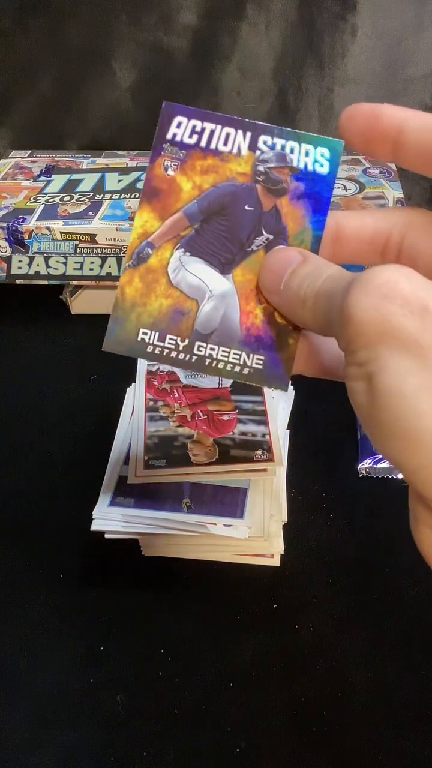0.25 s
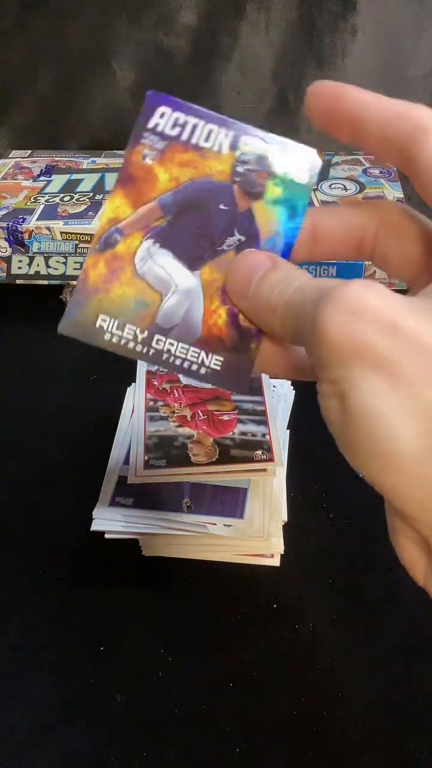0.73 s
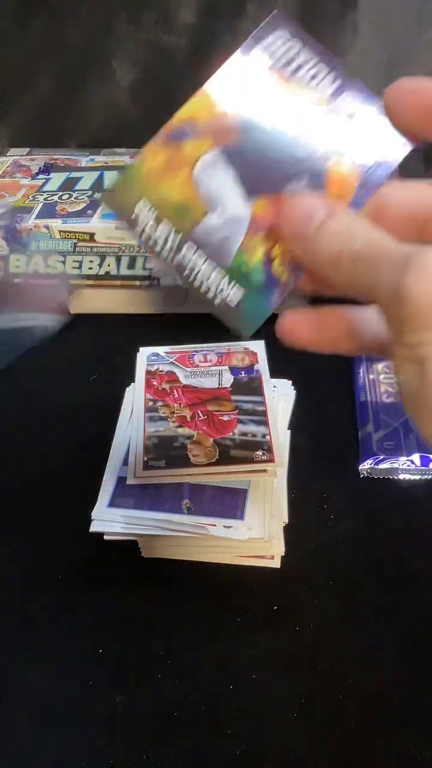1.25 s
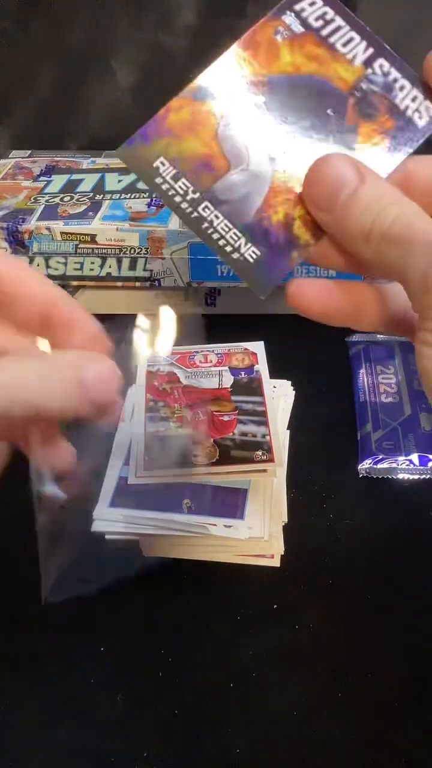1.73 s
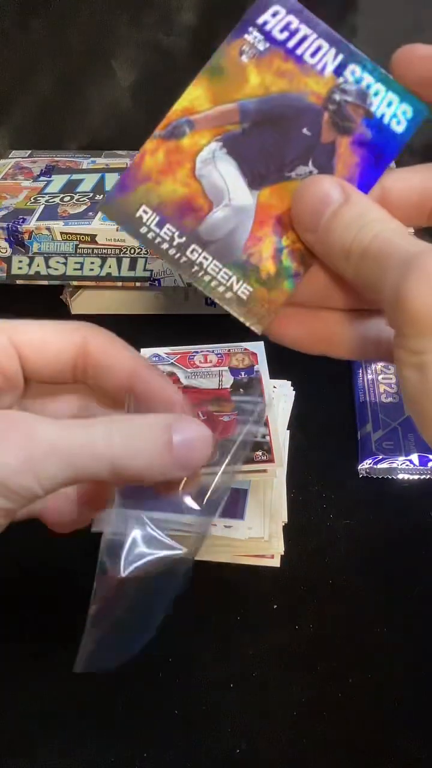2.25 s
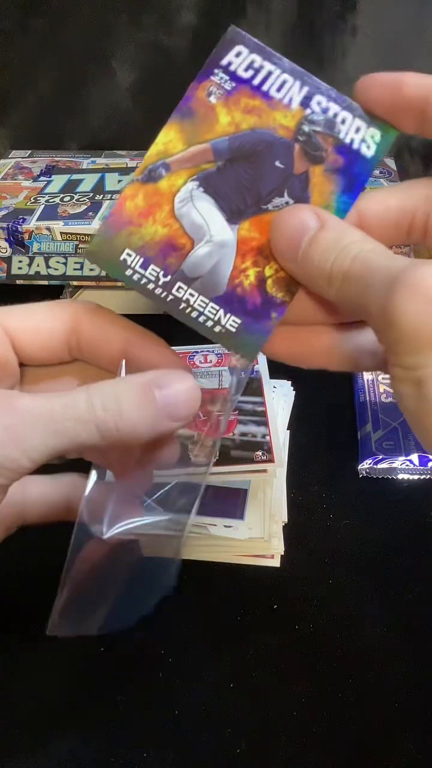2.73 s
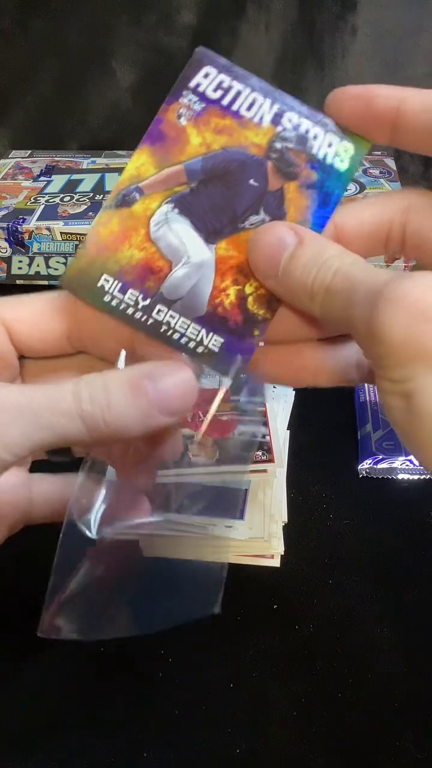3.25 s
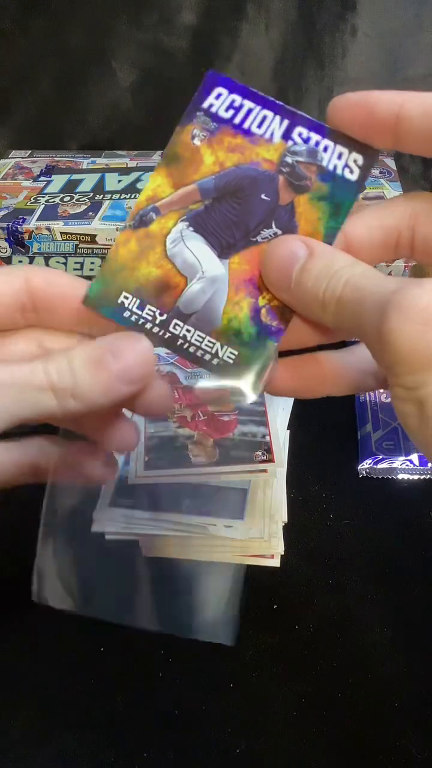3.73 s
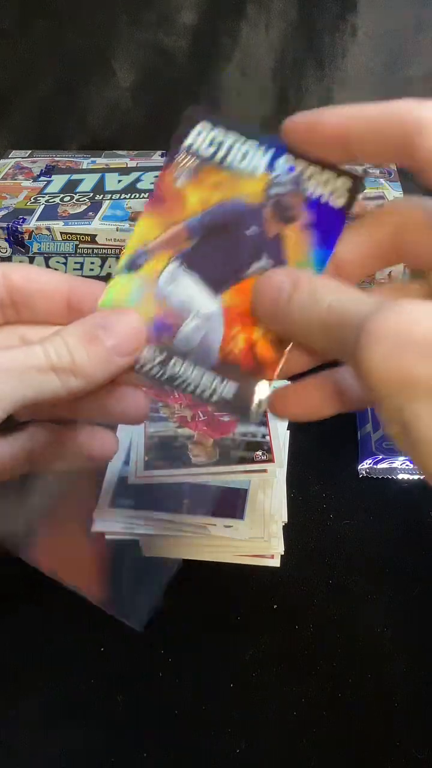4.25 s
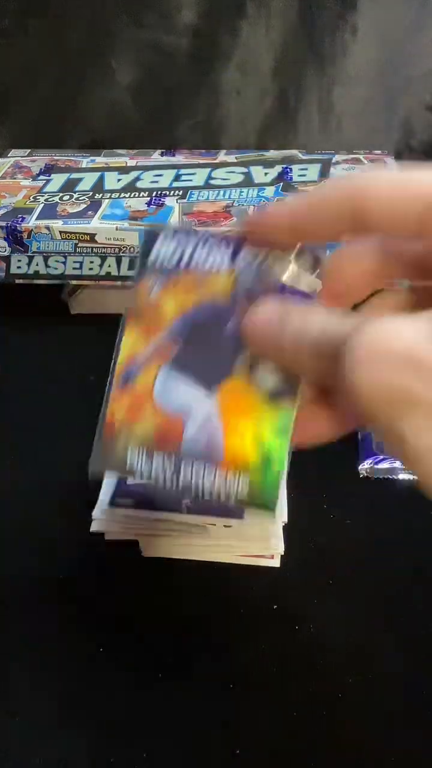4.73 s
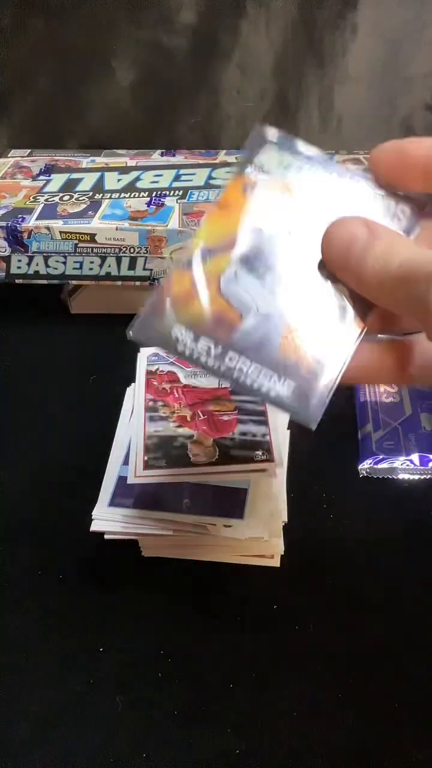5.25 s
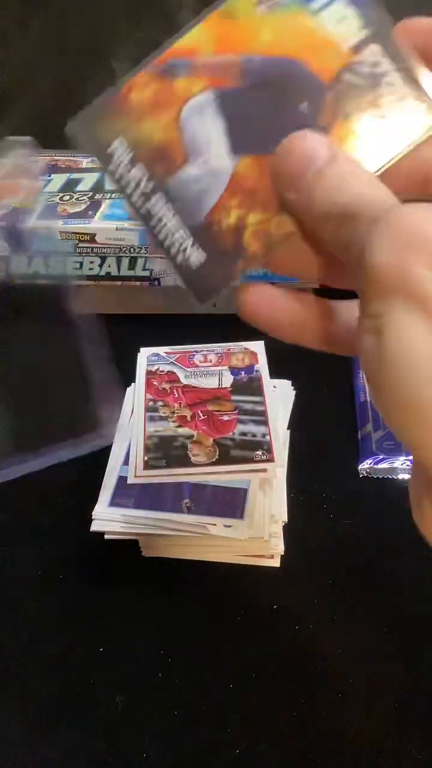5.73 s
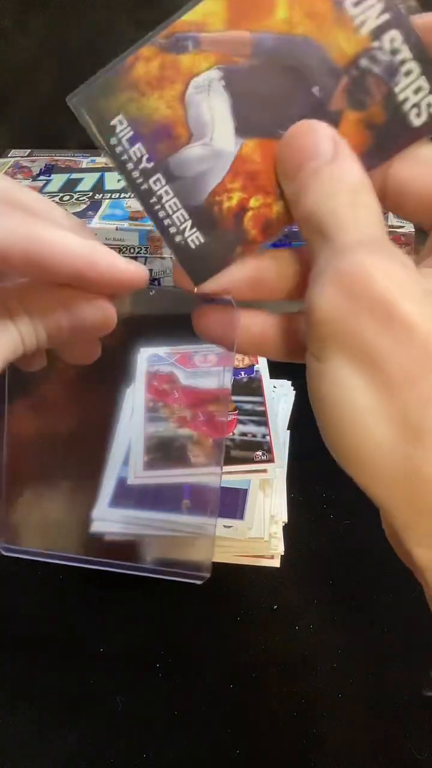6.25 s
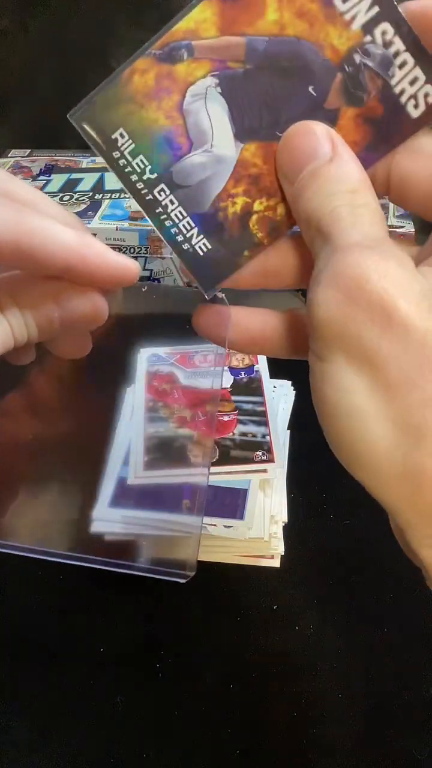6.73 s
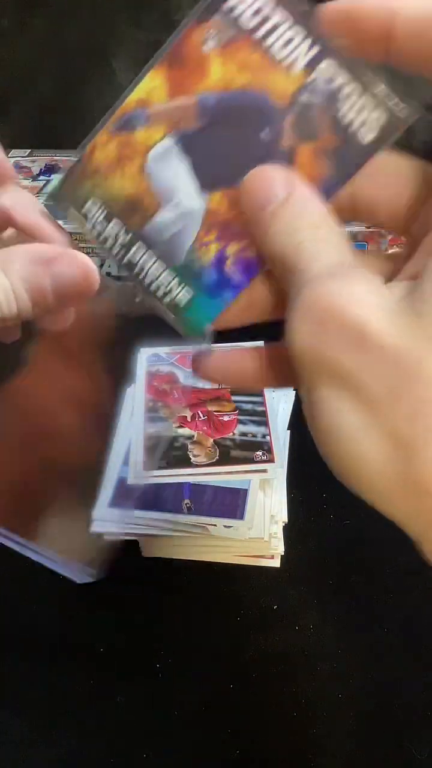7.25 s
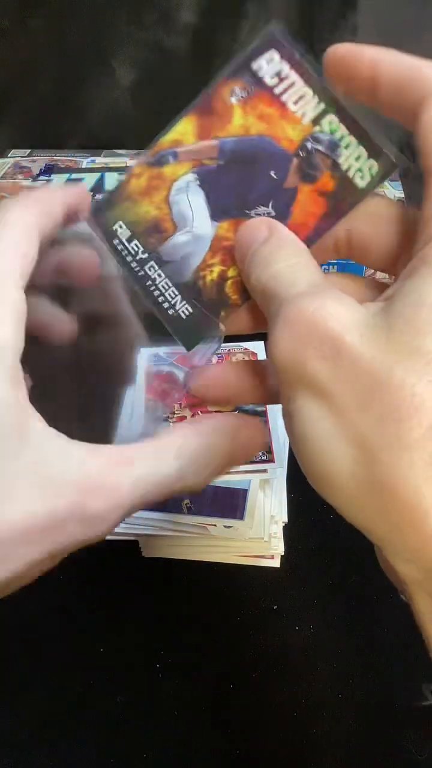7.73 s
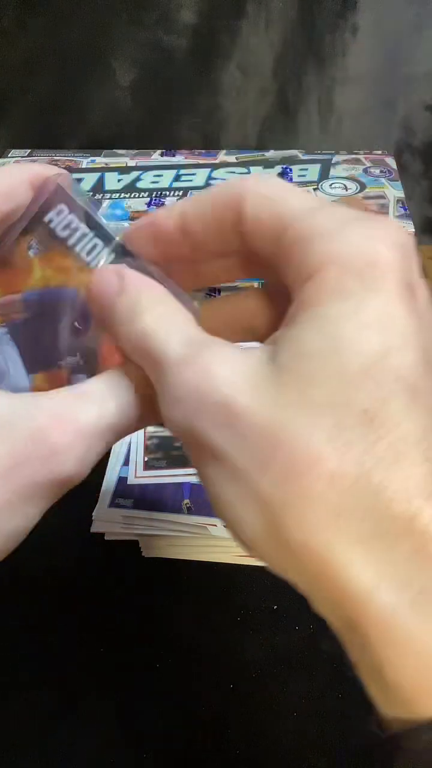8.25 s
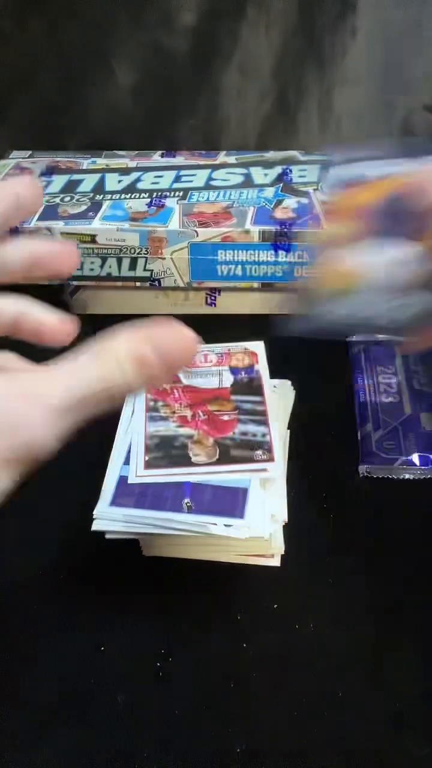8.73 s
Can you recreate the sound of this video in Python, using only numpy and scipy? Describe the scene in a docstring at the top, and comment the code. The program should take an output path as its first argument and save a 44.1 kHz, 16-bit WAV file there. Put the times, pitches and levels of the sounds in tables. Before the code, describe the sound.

A glossy card and soft plastic are handled close to the microphone in a small humming room. A dense burst of sharp snaps comes early, then scattered pops and clicks, quick raspy scrapes as the card enters a sleeve, a sparse pause, and lighter rubs and ticks against a stiff holder.

```python
"""Above a desk in a small humming room, a glossy card and soft plastic are handled close to the ear.
Buckling sheet snaps: a chirped spike and a short flutter drive a ringing filter, and weaker ticks follow.
Sliding faces hiss (shaped noise) and rasp (thousands of tiny slips); firmly gripped edges tick as they catch.
From 7 s the strokes take on the resonance of a stiff holder. Fingers rustle faintly around each stroke.
Quick reflections, a faint tail, a low rumble and wavering bands of hum place it in the room."""
import sys
import numpy as np
from scipy import signal
from scipy.fft import rfft, irfft
from scipy.io import wavfile
from scipy.ndimage import uniform_filter1d

SR = 44100
rng = np.random.default_rng(int(sys.argv[2]) if len(sys.argv) > 2 else 0)


def output_pcm(signal):
    """Save a mono or channel-first signal as 16-bit PCM at the path in sys.argv[1].

    Samples are clipped to [-1, 1] before scaling.
    """
    pcm = np.clip(np.atleast_2d(signal).T, -1, 1) * 32767
    wavfile.write(sys.argv[1], SR, np.round(pcm).astype(np.int16))


N = 396459  # length in samples, about 9 s

# sharp snaps, where an edge catches and a patch of sheet springs free, level before the sheet's colour:
# [t/s, level/dB, tilt/dB per octave, ring f/Hz]
SNAP_EVENTS = [(0.4538, -17, 7, 1510), (0.525, -27.5, 0, 6140), (0.592, -21, -1.5, 4340),
               (0.602, -13.5, -3, 6500), (0.641, -15.5, 2, 1650), (0.6635, -14.5, -2, 7800),
               (0.6947, -9, 6, 1340), (0.7059, -14, 2.5, 1600), (1.1658, -13, 5.5, 1280),
               (1.1977, -18.5, 0, 6300), (1.3856, -9.5, 0, 5850), (1.436, -7, 2, 1300),
               (1.6381, -23, .5, 4860), (2.011, -16, 4.5, 2550), (2.0463, -35, -4.5, 2680),
               (2.1138, -7, 0.5, 7250), (2.1705, -15, 2.5, 735), (2.1932, -19, 2.5, 7500),
               (2.7479, -30, 2.5, 1130), (3.213, -27, -3, 3620), (3.2444, -31.5, -3, 3380),
               (3.3271, -16, 3.5, 4160), (3.3406, -11, -3, 6300), (3.3465, -18, -4, 4310),
               (3.4731, -10, 0.7, 758), (3.5016, -18, 5.5, 1904), (3.6818, -25, -4.5, 8920),
               (3.9626, -18.5, 2, 1180), (4.0748, -18.5, 0, 1600), (4.24, -11, 0.7, 8900),
               (4.6783, -22, 0.3, 1650), (4.8637, -19.5, 4, 5650), (4.9442, -27, 1.5, 910),
               (5.756, -18, -1.5, 4840), (5.8915, -29, -2, 4730), (6.466, -30.5, 1, 1180),
               (6.8902, -17.5, 1, 4260), (7.0534, -25, 2.5, 3630), (7.0622, -28, 4, 3790),
               (7.0876, -31, -2.5, 8000), (7.4782, -26.5, -1, 2235), (7.5213, -31, -4.5, 5170),
               (7.6158, -16.5, 2.5, 1190), (7.9231, -23, 1.5, 7200), (8.3141, -19, 0.5, 4590),
               (8.3902, -27.5, 0, 6100), (8.4121, -24.5, -1, 1730), (8.6434, -23, -1, 2654),
               (8.6925, -27.5, -3, 2680), (8.7465, -12.5, 0.2, 2350), (8.768, -19, -1, 4660),
               (8.9031, -40.5, -7, 1750)]
# strokes of one face over another, level at full speed: [start t/s, length t/s, level/dB, grip 0-1]
STROKE_EVENTS = [(0.37, 0.13, -62, 0), (.62, 0.12, -50.5, 0.33), (1.12, 0.38, -65, 0.4),
                 (1.367, 0.085, -56.5, 0.3), (1.794, 0.2, -64.5, 0.2), (2.152, 0.17, -62, 0),
                 (2.336, 0.075, -62.5, .5), (2.633, 0.05, -61, 0.56), (3.019, 0.079, -57.5, 0.43),
                 (3.124, 0.036, -55, 0.74), (3.182, 0.094, -55, 0.83), (3.427, 0.041, -55.5, 0.89),
                 (3.489, 0.037, -49.5, 1), (3.598, .25, -59, .65), (3.778, 0.025, -50, 0.75),
                 (3.821, 0.015, -47.5, 0.8), (3.84, .08, -49, .75), (4.328, 0.24, -60, 0.32),
                 (4.487, 0.22, -57, 0.39), (4.985, 0.027, -59, 0), (5.037, 0.24, -67.5, 0),
                 (5.289, 0.06, -50, 0.14), (5.406, 0.12, -66, 0.8), (5.733, 0.033, -50.5, 0.9),
                 (7.19, 0.28, -66, 0), (7.391, .058, -55.5, 0.71), (7.46, 0.039, -52, 0.97),
                 (7.784, 0.058, -57.5, 0), (7.831, 0.036, -47, 0.14), (7.939, 0.37, -58, 0.16),
                 (8.288, 0.054, -45.5, 0.73), (8.601, 0.15, -58.5, 1), (8.754, 0.02, -44, 0.65)]
# how well the small sheets radiate when snapped: [f/Hz, level/dB]
SNAP_RADIATION = [(60, -19.5), (500, -.5), (1000, 1.3)]
# how well they radiate when rubbed, shape only: [f/Hz, level/dB]
RUB_RADIATION = [(60, -24.5), (450, -10.5), (750, -4), (3200, 3), (9500, 6)]
# resonances of the card and plastic cupped in the hands: [f/Hz, width f/Hz, height level/dB]
BODY_MODES = [(755, 49, 9), (1248, 150, 4.5), (2010, 250, 4.5), (2487, 94, 3.5), (4000, 150, 0.5)]
# resonance that the stiff holder adds to the strokes: [f/Hz, width f/Hz, height level/dB]
HOLDER_MODES = [(4800, 290, 2.5)]
# decay of the room: [f/Hz, t60 t/s]
ROOM_DECAY = [(300, 0.34), (9000, 0.44)]
# spectral shape of the steady room noise: [f/Hz, relative level/dB per Hz]
AIR_SPECTRUM = [(30, -55), (36, -44.5), (41, -1), (52, 1), (95, 2), (115, -5.5), (150, -3), (185, -16.5),
                (320, -11.5), (520, -24.5), (900, -30), (3500, -44), (9500, -43.5)]
# wavering hum of the room, rms before the overall hum trim: [f/Hz, level/dB]
HUM_BANDS = [(70.0, -55.5), (134.6, -55.5), (242.2, -69), (290.7, -66.5)]

EDGE_HZ = 9740  # top of the band
AIR_DB = -47  # rms of the steady room noise
HOLDER_FROM_S = 7  # the stiff holder is picked up
RING_DB = 11  # lift at the ring of each buckling patch
SETTLE_S, SETTLE_DB = 0.0064, -22  # typical delay and relative level of the tick after a snap
FASTEST_AT = 0.53  # share of a stroke's length at which it is fastest
HISS_TILT_DB, RASP_TILT_DB = 3, -5  # per octave: bright hiss, dull rasp
# catching edges: rate at full grip, middle level above the stroke, lowest ring
CATCHES_PER_S, CATCH_DB, CATCH_HZ = 55, 22.5, 704


def snaps(flutter_s=0.0026, flutter=0.94, ring_octaves=0.32, travel_s=0.0006978):
    """Each snap or tick is a spike and a short flutter, coloured by the patch of sheet that buckles."""
    out = np.zeros(N)
    hz = np.fft.rfftfreq(2048, 1 / SR)
    t = np.arange(len(hz)) / SR
    colour = read(SNAP_RADIATION, hz) + resonances(BODY_MODES, hz)
    # higher bending waves cross the sheet faster, so the spike leaves as a tiny falling chirp;
    # travel_s is the crossing time at 4 kHz
    bending_phase = -4j * np.pi * travel_s * np.sqrt(4000 * hz)
    chirp = irfft(np.exp(bending_phase))[:len(t)]
    for s, db, tilt, ring_hz in SNAP_EVENTS + settling() + catches():
        shiver = rng.standard_normal(len(t)) * np.exp(-t / flutter_s) * (t > travel_s)
        push = chirp + flutter * shiver / np.linalg.norm(shiver)
        distance = np.log2((hz + 1) / ring_hz) / ring_octaves
        ring = RING_DB * np.exp(-.5 * distance ** 2)
        sheet = causal(colour + tilt * octaves(hz) + ring)
        snap = signal.fftconvolve(push, sheet)
        # the flutter spreads the snap's energy in time without adding to it
        snap *= np.linalg.norm(band_limit(sheet)) / np.linalg.norm(band_limit(snap))
        add(out, s - travel_s / 2, amp(db) * snap)
    return out


def settling():
    """The weaker tick after each snap, from a neighbouring patch of the same sheet."""
    ticks = []
    variations = rng.standard_normal((len(SNAP_EVENTS), 3))
    for (s, db, tilt, ring_hz), (late, size, patch) in zip(SNAP_EVENTS, variations):
        at = s + SETTLE_S * 2 ** (late / 2)
        ticks.append((at, db + SETTLE_DB + 2 * size, tilt, ring_hz * 2 ** (patch / 2)))
    return ticks


def catches(ring_octaves=2.38, spread_db=4.5, tilt_db=-1):
    """Small dull ticks gathered around the middle of each stroke, more of them the firmer the grip."""
    ticks = []
    chances = rng.random((len(STROKE_EVENTS), 16, 4))  # up to 16 ticks a stroke
    for (s, length, db, grip), draws in zip(STROKE_EVENTS, chances):
        expected = CATCHES_PER_S * length * grip ** 2
        for chance, when, size, patch in draws:
            if chance * len(draws) < expected:
                at = s + length * np.arccos(1 - 2 * when) / np.pi
                level = db + CATCH_DB + spread_db * (2 * size - 1)
                ticks.append((at, level, tilt_db, CATCH_HZ * 2 ** (ring_octaves * patch)))
    return ticks


def strokes(swell=1.17, uneven_db=3.0):
    """Sliding plastic: smooth hiss and rasping slips follow the speed of the hand and its uneven grip."""
    out = np.zeros(N)
    hz = np.fft.rfftfreq(2048, 1 / SR)
    hiss = rng.standard_normal(N)
    wander = unit(uniform_filter1d(rng.standard_normal(N), size=700))
    uneven = amp(uneven_db * wander)
    colour = read(RUB_RADIATION, hz) + resonances(BODY_MODES, hz)
    for s, length, db, grip in STROKE_EVENTS:
        at = np.arange(int(s * SR), min(int((s + length) * SR), N))
        progress = (at / SR - s) / length
        rise_and_fall = np.interp(progress, [0, FASTEST_AT, 1], [0, 1, 0])
        speed = np.sin(np.pi / 2 * rise_and_fall) ** swell
        holder = (s > HOLDER_FROM_S) * resonances(HOLDER_MODES, hz)
        # the grip is the share of rasp, by energy
        layers = (hiss[at], 1 - grip, HISS_TILT_DB), (rasp(speed), grip, RASP_TILT_DB)
        for friction, share, tilt in layers:
            sheet = causal(colour + tilt * octaves(hz) + holder)
            driven = friction * speed * uneven[at]
            rub = band_limit(signal.fftconvolve(driven, sheet)[:len(at)])
            add(out, s, amp(db) * unit(rub) * np.sqrt(share * np.mean(speed ** 2)))
    return out


def rasp(speed, slips_per_s=1500, spread_db=4, slip_s=0.002, tone=1, count=24):
    """Tiny slips, thicker at speed; each scuffs one of many patches of plastic that ring for a moment."""
    size = amp(spread_db * np.minimum(rng.exponential(1, len(speed)), 3))
    slips = size * (rng.random(len(speed)) < slips_per_s * np.sqrt(speed) / SR)
    patch = rng.integers(0, count, len(speed))
    t = np.arange(SR // 200) / SR
    pitch = (np.arange(count) + rng.random(count))[:, None] * EDGE_HZ / count
    rings = tone * np.sin(2 * np.pi * pitch * t) + rng.standard_normal((count, len(t))) / 2
    rings *= np.exp(-t / slip_s)
    scuffs = sum(signal.oaconvolve(slips * (patch == k), rings[k]) for k in range(count))
    return unit(scuffs[:len(speed)])


def fidget(level_db=-70):
    """Around each stroke the fingers keep shifting and draw a faint, toneless rustle from the plastic."""
    t = np.arange(N) / SR
    sliding = sum((t > s) & (t < s + length) for s, length, *_ in STROKE_EVENTS) > 0
    # share of the surrounding half second spent sliding
    busy = np.clip(uniform_filter1d(sliding.astype(float), size=SR // 2), 0, 1)
    return amp(level_db) * rasp(busy, slips_per_s=260, tone=0)


def room(x, near_db=-15, far_db=-23.5):
    """Quick reflections from the desk and boxes, then the faint tail of the walls, as decaying noise."""
    t = np.arange(SR // 2) / SR
    near, far = rng.standard_normal((2, len(t)))
    near_t60, desk_s = .055, .0065  # decay and first arrival, both in seconds
    near *= amp(-60 * t / near_t60) * (t > desk_s)
    hz, age, z = signal.stft(far * (t > 2 * desk_s), SR, nperseg=256)
    fade = amp(-60 * age / read(ROOM_DECAY, hz)[:, None])
    far = signal.istft(z * fade, SR, nperseg=256)[1][:len(t)]
    echoes = amp(near_db) * near / np.linalg.norm(near) + amp(far_db) * far / np.linalg.norm(far)
    return signal.fftconvolve(x, echoes)[:N]


def background(waver_hz=3.45, hum_db=-1):
    """Low rumble and faint hiss from shaped noise, with narrow noise bands of hum that waver."""
    hz = np.fft.rfftfreq(N, 1 / SR)
    air = unit(irfft(rfft(rng.standard_normal(N)) * amp(read(AIR_SPECTRUM, hz)), N))
    drone = rfft(rng.standard_normal(N))
    hum = np.zeros(N)
    for f, db in HUM_BANDS:
        band = drone / (1 + ((hz - f) / waver_hz) ** 2)
        hum += amp(db) * unit(irfft(band, N))
    return amp(AIR_DB) * air + amp(hum_db) * hum


def resonances(modes, hz):
    """Level in dB that a set of resonant peaks adds at each frequency."""
    return sum(db / (1 + (2 * (hz - f) / width) ** 2) for f, width, db in modes)


def octaves(hz):
    """Octaves above 4 kHz, held constant below 600 Hz, the sheets' lowest bending note."""
    return np.log2(np.maximum(hz, 600) / 4000)


def causal(db):
    """Shortest ringing (minimum-phase) response that has the given spectrum."""
    cepstrum = irfft(np.log(amp(np.maximum(db, -100))))
    half = len(cepstrum) // 2
    # folding the cepstrum forward puts the energy as early as possible
    cepstrum[1:half] *= 2
    cepstrum[half + 1:] = 0
    return irfft(np.exp(rfft(cepstrum)))[:half]


def band_limit(x):
    """Steep low-pass at the top of the band."""
    lowpass = signal.firwin(301, EDGE_HZ, window=("kaiser", 8), fs=SR)
    return signal.oaconvolve(x, lowpass, "same")


def amp(db):
    """Decibels to gain."""
    return 10 ** (np.asarray(db) / 20)


def unit(x):
    """Scales to an rms of one."""
    return x / np.sqrt(np.mean(x ** 2) + 1e-20)


def read(points, hz):
    """Reads a curve along a logarithmic frequency axis."""
    f, value = np.transpose(points)
    return np.interp(np.log(hz + 1), np.log(f), value)


def add(mix, s, sound):
    """Mixes a sound in at time s."""
    part = mix[max(round(s * SR), 0):][:len(sound)]
    part += sound[:len(part)]


def scene():
    """Card and plastic handled in the humming room."""
    handling = snaps() + strokes() + fidget()
    return (handling + room(handling) + background())[None]


def record(dry):
    """The recorder only limits the band."""
    return np.array([band_limit(channel) for channel in dry])


dry = scene()
out = record(dry)
output_pcm(out)
```